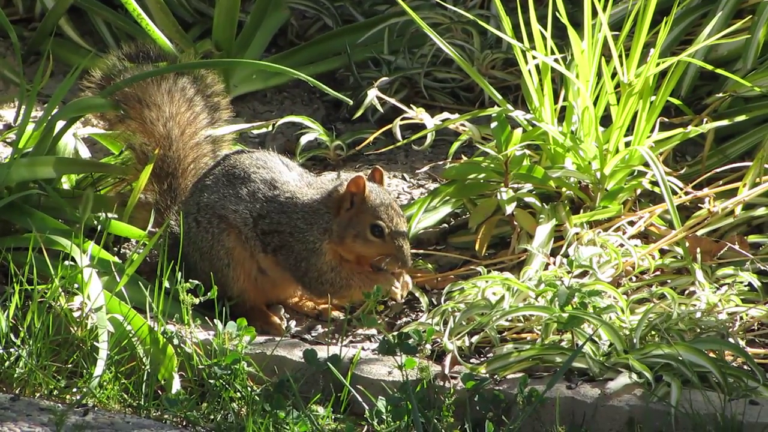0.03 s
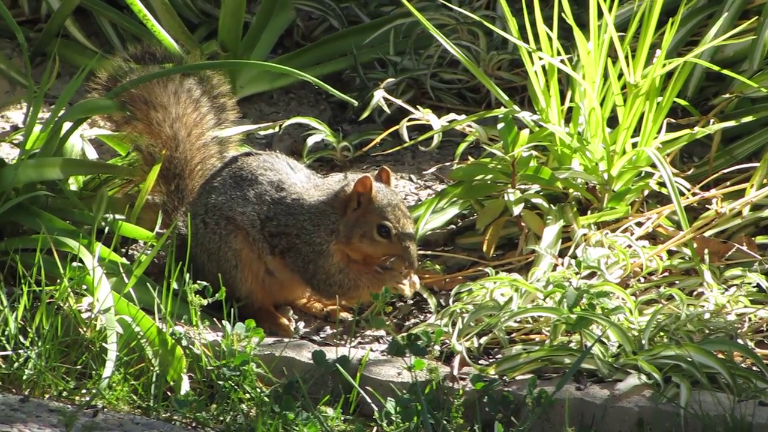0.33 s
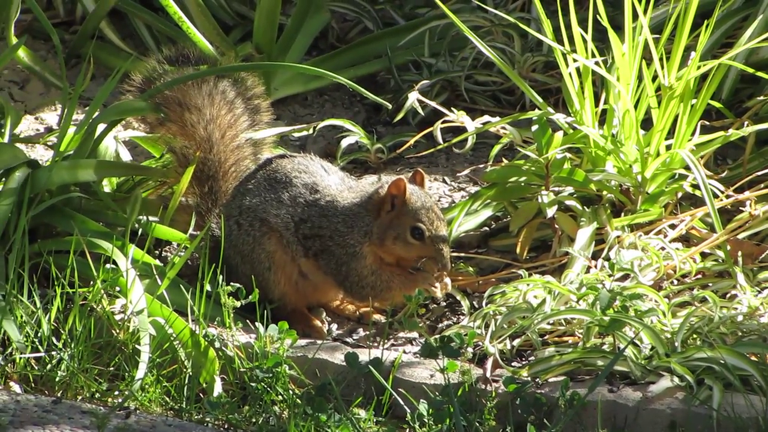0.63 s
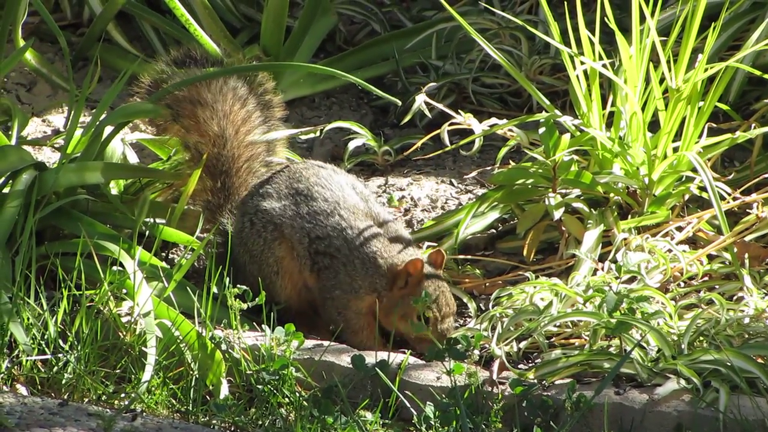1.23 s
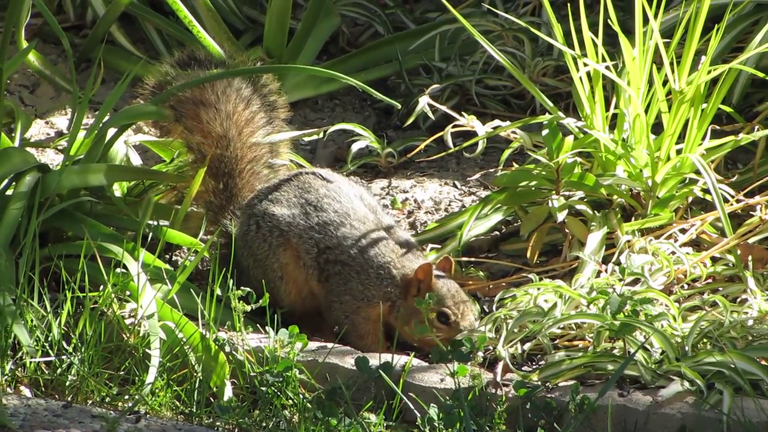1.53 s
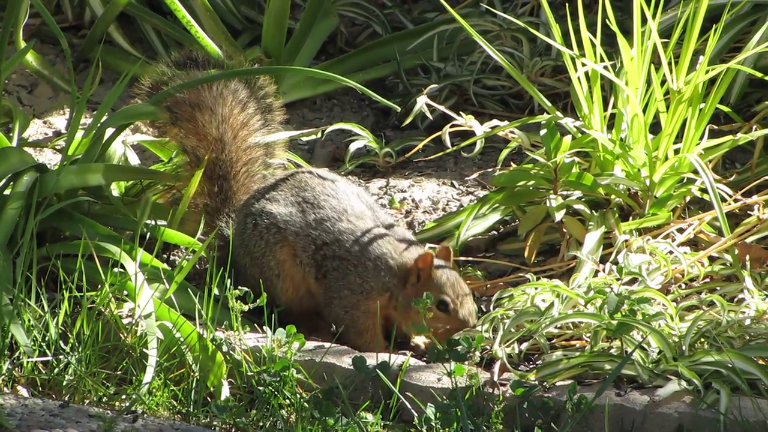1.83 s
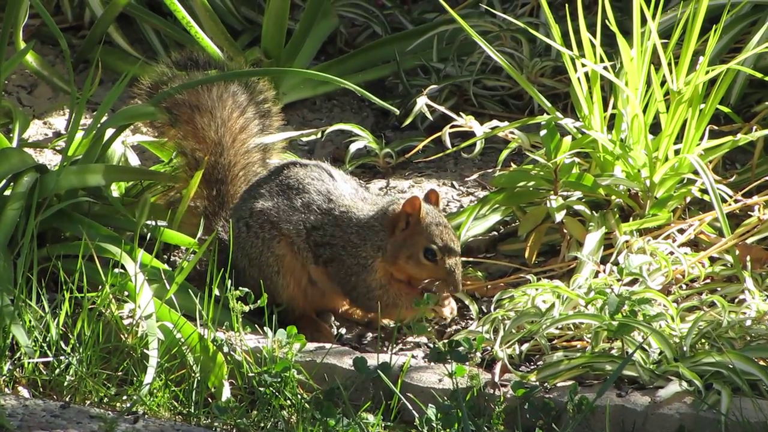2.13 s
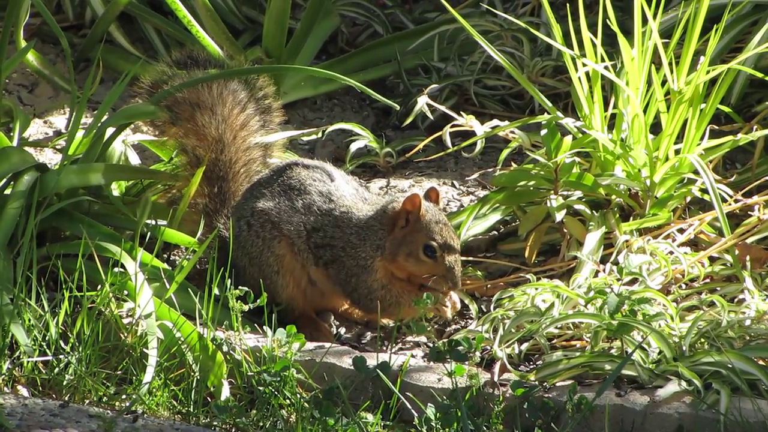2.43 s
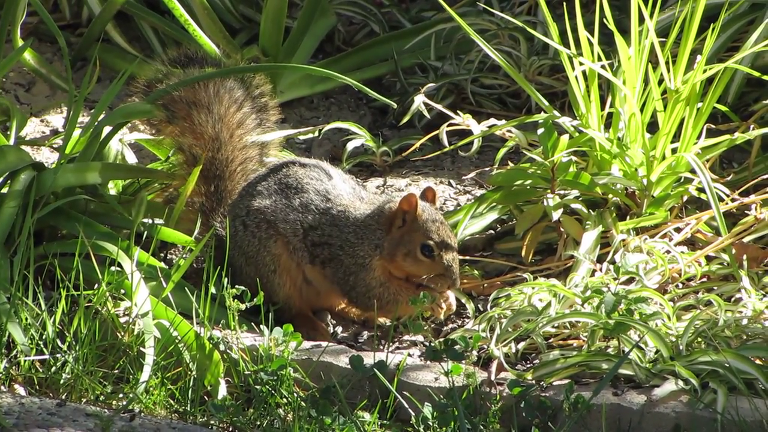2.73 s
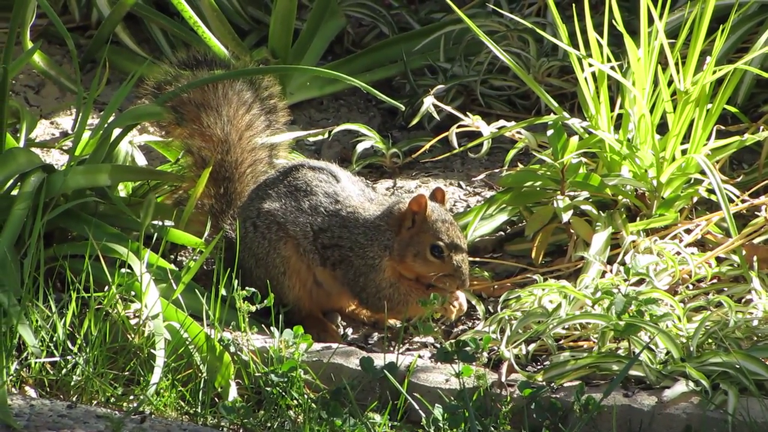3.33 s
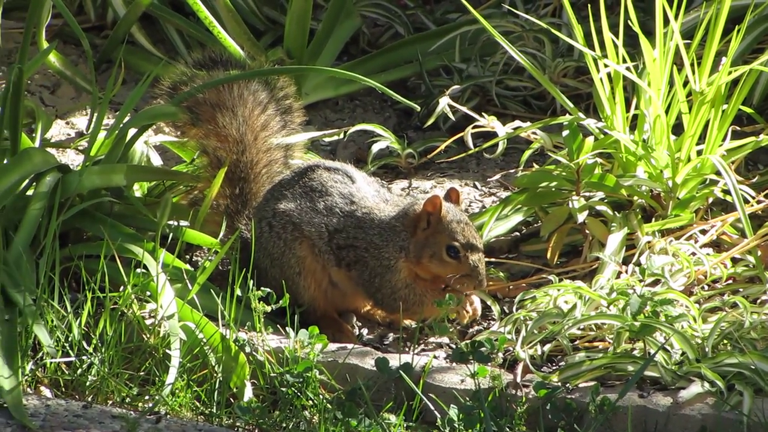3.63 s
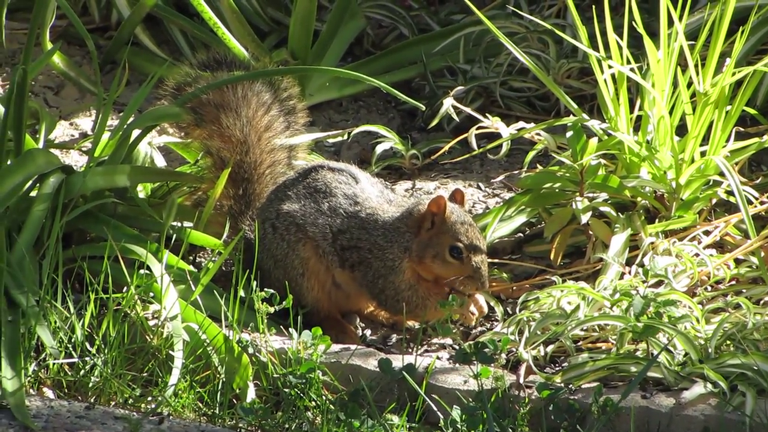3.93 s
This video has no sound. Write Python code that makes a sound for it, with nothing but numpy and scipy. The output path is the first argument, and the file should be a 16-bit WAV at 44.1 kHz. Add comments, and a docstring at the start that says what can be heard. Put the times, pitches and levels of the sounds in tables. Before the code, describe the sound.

Low, gusty wind buffets the microphone outdoors, growing stronger partway through and causing two brief clicks. Underneath are an even hum of far traffic, faintly stirring leaves, thin bird calls and a few small dry snaps as a squirrel feeds.

```python
"""Distant traffic spreads an even wash over a garden. A breeze rumbles on the two microphone ports,
buffets them in gusts and faintly stirs the leaves; two sharp clicks sound as the strongest gusts
overload the right microphone. Small birds give thin high whistles and quick, two-voiced trills.
Three small dry snaps and ticks sound, the clearest from a squirrel feeding in dry litter."""
import sys
import numpy as np
from scipy import signal
from scipy.fft import rfft, irfft
from scipy.io import wavfile

SR = 44100
rng = np.random.default_rng(int(sys.argv[2]) if len(sys.argv) > 2 else 0)


def generate_wav(sig):
    """Save sig (samples, or channels by samples) to the path in sys.argv[1] as 16-bit PCM at SR."""
    pcm = np.round(np.clip(np.atleast_2d(sig).T, -1, 1) * 32767).astype(np.int16)
    wavfile.write(sys.argv[1], SR, pcm)


N = 176400
TIME = np.arange(N) / SR


def traffic(base_db=-35.5, waver_db=.4):
    """Far roads merge into a smooth wash whose level sways slightly."""
    # Each row: frequency in Hz, relative noise density in dB.
    spectrum = [(25, -0.5), (50, -7), (70, -9), (130, -8.5), (190, -8), (255, -8), (310, -13.5),
                (500, -13.5), (800, -17), (1050, -20.5), (1500, -21), (2200, -26.5), (2900, -27),
                (4200, -33), (6000, -38.5), (8200, -44), (10500, -50.5), (15500, -57.5)]
    # Each row: time in seconds, level offset in dB.
    swell = [(0, 1), (1.0, 0.5), (1.8, -0.5), (2.4, 1), (3.0, -1), (3.5, 0), (3.7, -4.5), (4, -1.5)]
    # Each row: frequency in Hz, left-right correlation.
    correlation = [(30, 0.98), (120, 1), (260, 0.98), (500, 0.88), (900, 0.82), (1400, 0.38),
                   (2100, -0.038), (2800, -0.058), (4100, 0.17), (5000, -0.35), (6200, -0.48),
                   (7100, -0.36), (8300, -0.089)]
    level_db = base_db + in_time(swell) + waver_db * drift(14)
    return pan(.15) * from_db(level_db) * coloured(spectrum, correlation)


def wind():
    """Air flow over the two ports: separate rumble on each, plus single eddies."""
    # Left port. Each row: time in seconds, rumble level in dB.
    left_flow = [(0, -25), (.33, -29.5), (.45, -40), (.8, -48), (1.1, -49), (1.3, -31), (1.42, -38),
                 (1.55, -31.5), (1.85, -18.5), (2.2, -37.5), (2.5, -34), (2.85, -18.5), (3.08, -35),
                 (3.35, -28), (3.7, -27), (4, -23)]
    # Right port, same columns.
    right_flow = [(0, -29.5), (.35, -38.5), (.7, -43), (1.53, -45), (1.6, -18), (1.9, -39), (2.08, -25),
                  (2.2, -18), (2.55, -24.5), (2.85, -17.5), (3.05, -26.5), (3.25, -18), (3.62, -15.5),
                  (3.7, -31.5), (4, -26)]
    return np.array([breeze(left_flow), breeze(right_flow)]) + buffets()


def breeze(flow, corner_hz=64.3, lumps_db=2.5, flutter_hz=(121.6, 217)):
    """Lumpy rumble on one port; stronger flow adds a faster flutter."""
    level_db = in_time(flow) + lumps_db * drift(42)
    flutter = unit_rms(butter(rng.standard_normal(N), flutter_hz, "band", order=3))
    flutter_db = -17 + .5 * (level_db + 21)  # relative to the rumble
    return from_db(level_db) * (turbulence(corner_hz, N) + from_db(flutter_db) * flutter)


def buffets(sigma_s=.014, boost_db=1.5):
    """Each eddy is a short bell-shaped burst of turbulence, different on each port."""
    # Each row: peak time in seconds, left and right level before boost in dB, nominal corner in Hz.
    eddies = [(0.039, -13.5, -34, 37.6), (0.106, -16.5, -18, 51.6), (0.359, -17.5, -24.5, 46.5),
              (0.97, -23, -28, 63), (1.288, -25.5, -39, 62), (1.7, -20.5, -22.5, 91), (1.799, -11, -7, 101),
              (1.885, -25, -15.5, 85), (1.94, -34, -13.5, 85), (2.03, -23.5, -14.5, 75.4),
              (2.17, -29, -12, 96), (2.325, -16, -18, 78.5), (2.355, -13, -15.5, 82), (2.475, -47, -16, 66),
              (2.64, -19, -25.5, 88), (2.805, -12.5, -7, 78), (2.925, -19.5, -7, 109),
              (3.291, -13, -22.5, 55.7), (3.354, -13.5, -9.5, 61), (3.45, -37, -17.5, 92),
              (3.52, -15.5, -30, 88), (3.552, -15.5, -23, 80), (3.576, -21, -9, 69),
              (3.612, -33, -15.5, 86), (3.789, -16, -24, 95), (3.888, -26.5, -25, 61.6)]
    out, size = np.zeros((2, N + SR)), SR // 5
    bell = np.exp(-.5 * ((np.arange(size) - size / 2) / SR / sigma_s) ** 2)
    bell_rms = np.sqrt(np.mean(bell ** 2))
    for peak_s, left_db, right_db, corner_hz in eddies:
        start = int(peak_s * SR) + size // 2
        for port, db in enumerate((left_db, right_db)):
            swirl = bell_rms * unit_rms(bell * turbulence(1.03 * corner_hz, size))
            out[port, start:start + size] += from_db(db + boost_db) * swirl
    return out[:, size:size + N]


def turbulence(corner_hz, size, skirt_db=-16, low_cut_hz=13.6):
    """Pressure swirls on one port: sloping above the corner, then falling steeply to a faint skirt."""
    sloped = butter(rng.standard_normal(size + SR // 10), corner_hz, "low", order=1)
    top_hz = 1.716 * corner_hz
    body = butter(sloped, top_hz, "low", order=3)
    skirt = from_db(skirt_db) * butter(sloped, top_hz, "low")
    return unit_rms(butter(body + skirt, low_cut_hz, "high", order=1)[-size:])


def snaps_and_clicks(spike_decay_s=.0012, burst_peak_s=.009, tail_decay_s=.025, tail_db=-8):
    """Dry snaps and ticks crumble briefly; gusts overloading the right microphone give bare clicks."""
    # Each row: start in seconds, spike level in dB, left minus right in dB,
    # relative after-sound in dB (before halving), tilt in dB per octave.
    # The rows at 2.801 and 3.5752 s are the overload clicks, the other three dry snaps and ticks.
    transients = [(.9648, -34.5, 1.5, -11, -1.5), (2.238, -57, .5, -5, 7), (2.801, -46, -2.5, -28, 5),
                  (3.5752, -43, -8, -28, 1.5), (3.931, -57, 0, -15, 0)]
    # Each row: frequency in Hz, relative noise density in dB before tilt.
    spectrum = [(1500, -20), (4000, -3), (6500, -1), (8700, 0), (10500, -5), (12000, -11), (15500, -12),
                (18000, -35)]
    out = np.zeros((2, N))
    grain = unit_rms(from_db(2.5 * drift(500)))
    for start_s, db, pan_db, after_db, tilt in transients:
        t = np.maximum(TIME - start_s, 0)
        spike = np.exp(-t / spike_decay_s)
        burst = grain * np.exp(-2 * (t / burst_peak_s - 1) ** 2)
        tail = from_db(tail_db) * np.exp(-t / tail_decay_s)
        envelope = (t > 0) * (spike + from_db(after_db) * (burst + tail) / 2)
        noise = coloured([(hz, band_db + tilt * np.log2(hz)) for hz, band_db in spectrum])
        out += pan(pan_db) * from_db(db) * envelope * noise
    return out


def birds(flutter_db=3.5):
    """One bird whistles left of centre, another trills right of it; the level flutters."""
    song = pan(2.5) * whistles() + pan(-3.5) * trills()
    return song * from_db(flutter_db * drift(50))


def whistles(waver_hz=67.5):
    """Thin single tones, each wavering about one pitch."""
    # Each row: start in seconds, length in seconds, pitch in Hz, level in dB.
    calls = [(.73, .06, 6380, -65), (.8, .25, 6390, -67), (1.27, .08, 6400, -72), (2.87, .07, 6400, -69),
             (3.39, .12, 6420, -71), (3.51, .04, 6500, -70), (3.558, .045, 6400, -58),
             (3.605, .06, 6390, -61), (3.67, .22, 6400, -71.5), (3.71, .05, 4150, -67),
             (3.89, .05, 4130, -59), (3.965, .05, 6380, -69)]
    offset_hz = waver_hz * drift(90)
    return sum(from_db(db) * note(start_s, length_s, hz, offset_hz) for start_s, length_s, hz, db in calls)


def trills(note_s=.0367, upper_hz=8160, lower_hz=7140, lower_db=-4, waver_hz=130):
    """Quick runs of notes, two voices falling together in each."""
    # Each row: start in seconds, level of the upper voice in dB.
    notes = [(0.0, -72), (.06, -71), (.118, -73), (1.14, -69), (1.203, -64), (1.268, -63), (1.333, -67),
             (1.398, -71), (1.455, -72), (1.515, -73), (2.878, -64), (2.945, -67), (3.012, -68),
             (3.08, -70)]
    offset_hz = waver_hz * drift(200)
    out = np.zeros(N)
    for start_s, db in notes:
        upper = note(start_s, note_s, upper_hz, offset_hz, fall=.05)
        lower = note(start_s, note_s, lower_hz, offset_hz, fall=.025)
        out += from_db(db) * (upper + from_db(lower_db) * lower)
    return out


def note(start_s, length_s, hz, offset_hz, fall=0, edge_s=.0076):
    """Soft-edged wavering sine; the pitch droops by the fraction `fall` towards its end."""
    out = np.zeros(N)
    on = (TIME >= start_s) & (TIME < start_s + length_s)
    t = TIME[on] - start_s
    pitch_hz = hz * (1 - fall * (t / length_s) ** 2) + offset_hz[on]
    envelope = np.clip(np.minimum(t, length_s - t) / edge_s, 0, 1)
    out[on] = np.sqrt(2) * envelope * np.sin(2 * np.pi * np.cumsum(pitch_hz) / SR)
    return out


def garden_echo(x, t60_s=.35, wet_db=-1):
    """Foliage and walls scatter a short diffuse tail."""
    tail = rng.standard_normal((2, SR)) * from_db(-60 * TIME[:SR] / t60_s)
    tail /= np.sqrt(np.sum(tail ** 2, axis=1, keepdims=True))
    return x + from_db(wet_db) * signal.fftconvolve(x, tail, axes=1)[:, :N]


def leaves(flicker_db=1.5):
    """Leaves stirred by the breeze: a faint flickering rustle."""
    # Each row: time in seconds, level in dB.
    stir = [(0, -72), (.5, -58), (.7, -91), (1.55, -55), (1.9, -73), (2.35, -56.5), (2.7, -54), (3.0, -66),
            (3.35, -63), (3.5, -54), (3.7, -58), (4, -56.5)]
    # Each row: frequency in Hz, relative noise density in dB.
    spectrum = [(800, -21), (2500, -1), (5000, -7), (9000, -20), (15500, -28)]
    return from_db(in_time(stir) + flicker_db * drift(40)) * coloured(spectrum)


def coloured(spectrum, correlation=None):
    """Stereo noise of unit rms with a given spectrum and left-right correlation."""
    hz = np.maximum(np.fft.rfftfreq(N, 1 / SR), 1)
    alike = np.clip(at_hz(correlation, hz), -1, 1) if correlation else 0
    mid, side = rfft(rng.standard_normal((2, N)))
    stereo = np.sqrt(1 + alike) * mid + np.sqrt(1 - alike) * side * [[1], [-1]]
    return unit_rms(irfft(stereo * from_db(at_hz(spectrum, hz)), N))


def drift(corner_hz, hop=40):
    """Smooth random curve of unit rms, computed every `hop` samples."""
    pole = np.exp(-2 * np.pi * corner_hz * hop / SR)
    noise = rng.standard_normal(N // hop + 2002)
    slow = signal.lfilter([1], [1, -2 * pole, pole * pole], noise)[2000:]  # skip filter settling
    return np.interp(np.arange(N) / hop, np.arange(len(slow)), unit_rms(slow))


def from_db(db):
    """Decibels to gain."""
    return 10 ** (np.asarray(db) / 20)


def unit_rms(x):
    """Scale to rms 1."""
    return x / np.sqrt(np.mean(x ** 2) + 1e-20)


def in_time(rows):
    """Interpolate (seconds, value) rows at every sample."""
    return np.interp(TIME, *np.transpose(rows))


def at_hz(rows, hz):
    """Interpolate (Hz, value) rows on a log-frequency axis."""
    row_hz, values = np.transpose(rows)
    return np.interp(np.log(hz), np.log(row_hz), values)


def pan(db):
    """Channel gains for a left-minus-right level."""
    return from_db(np.array([[db], [-db]]) / 2)


def butter(x, hz, kind, order=2):
    """Causal Butterworth filter."""
    return signal.sosfilt(signal.butter(order, hz, kind, fs=SR, output="sos"), x)


def scene():
    """Wind on the ports over traffic, leaves, echoing birds, dry snaps and overload clicks."""
    return wind() + traffic() + leaves() + garden_echo(birds()) + snaps_and_clicks()


def record(dry, cutoff_hz=15750):
    """Soft limiting at full scale, then a steep low-pass."""
    limited = dry / (1 + dry ** 6) ** (1 / 6)
    return signal.sosfilt(signal.ellip(12, .1, 80, cutoff_hz, fs=SR, output="sos"), limited)


dry = scene()
out = record(dry)
generate_wav(out)
```